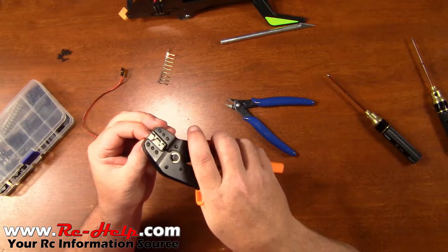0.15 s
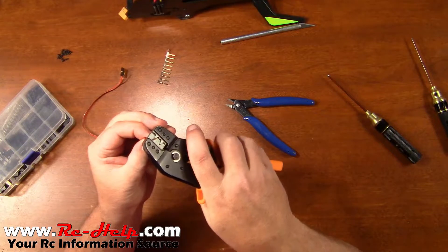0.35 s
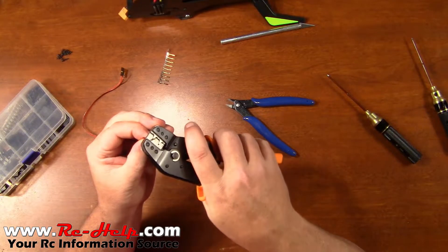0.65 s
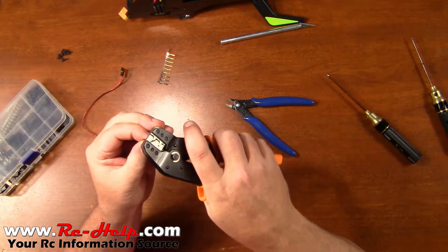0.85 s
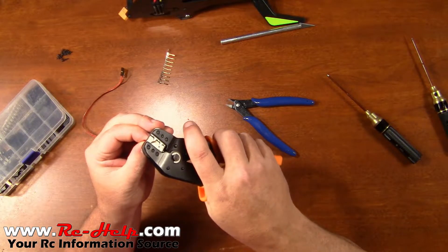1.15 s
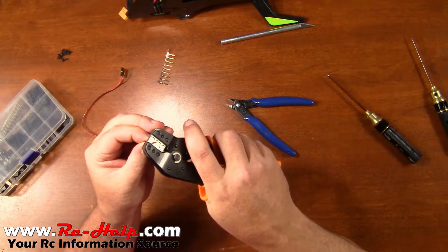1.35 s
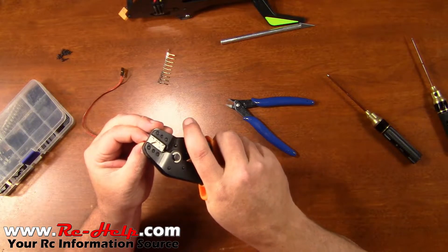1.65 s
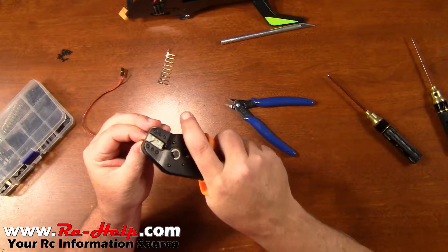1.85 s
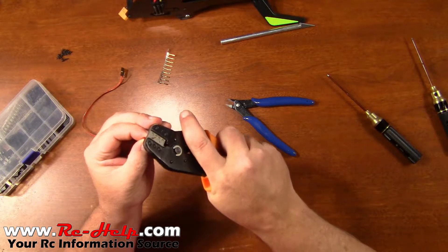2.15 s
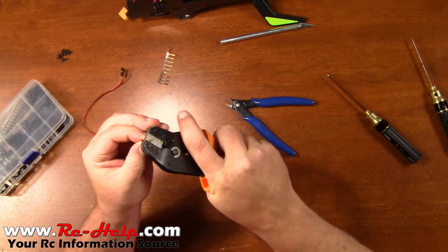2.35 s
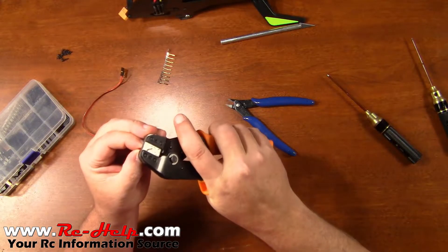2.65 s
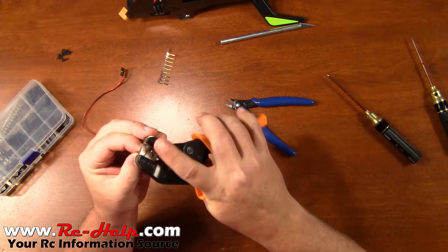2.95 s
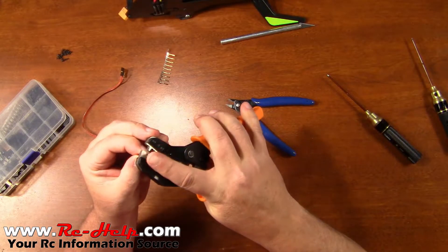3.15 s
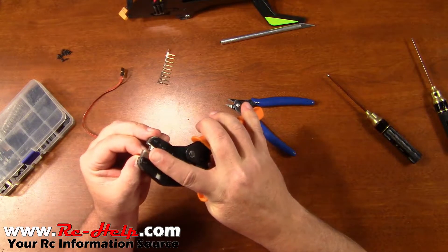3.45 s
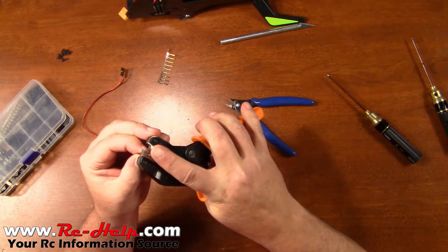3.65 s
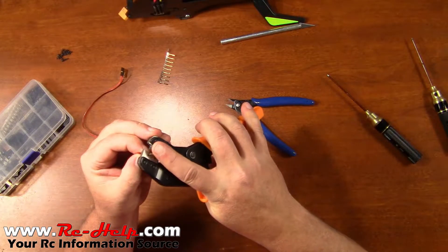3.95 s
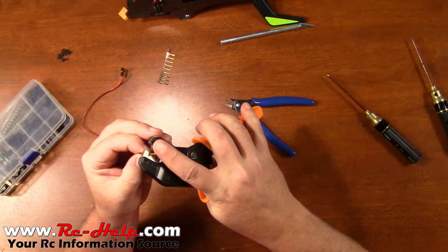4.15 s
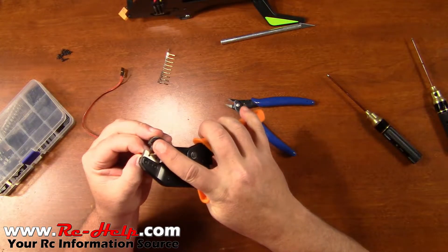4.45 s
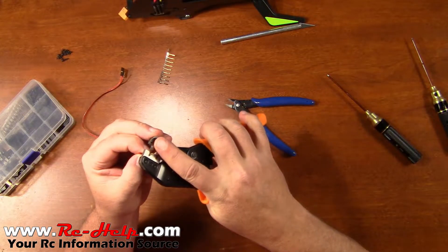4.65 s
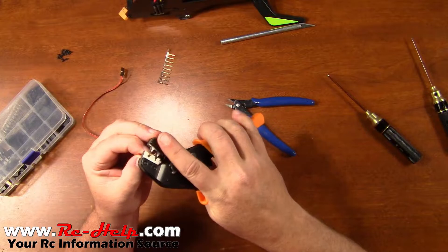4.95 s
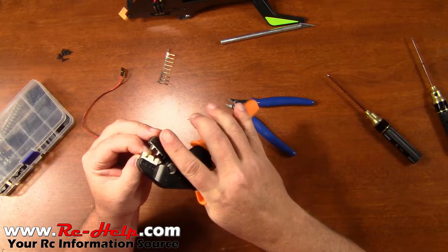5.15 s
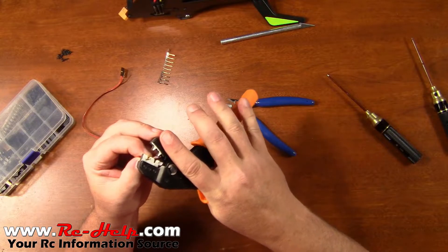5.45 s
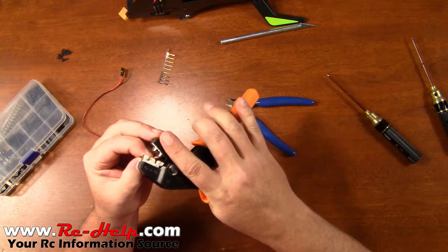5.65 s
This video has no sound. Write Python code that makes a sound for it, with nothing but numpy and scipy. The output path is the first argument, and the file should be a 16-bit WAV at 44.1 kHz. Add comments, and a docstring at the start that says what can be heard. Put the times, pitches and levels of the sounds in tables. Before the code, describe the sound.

A hand crimping tool clicks a few times as it closes, knocks softly, rattles open rapidly, and later twangs faintly over low room rumble.

```python
"""A low rumble, a dull drone, hiss and a faint mains hum lie under a small, quiet room: shaped noise and sines.
A ratcheting wire crimper is then worked over a wooden bench: its steel pawl snaps over the teeth as the handles
close, the jaws knock shut, the linkage shifts, the pawl rattles back, the return spring twangs; a faint tick ends it.
Each contact is a short noise burst coloured by the tool's resonances, with the handle and frame ringing faintly;
twang and tick are a light scrape with ringing modes. Bench scatter and a short room tail follow each burst."""
import sys
import numpy as np
from scipy import signal
from scipy.fft import rfft, irfft, next_fast_len
from scipy.io import wavfile
from scipy.ndimage import map_coordinates

SR = 44100
rng = np.random.default_rng(int(sys.argv[2]) if len(sys.argv) > 2 else 0)


def dump(signal):
    """Clip the signal to [-1, 1] and save it as 16-bit WAV at the path in sys.argv[1]."""
    limited = np.clip(np.atleast_2d(signal).T, -1, 1)
    pcm = np.round(limited * 32767).astype(np.int16)
    wavfile.write(sys.argv[1], SR, pcm)


N = 255780
LIFE = np.arange(SR) / SR  # time axis of one blow (s)
BLOW_HZ = np.fft.rfftfreq(SR, 1 / SR)  # frequency axis of one blow (Hz)


def amp(db):
    """Decibels to gain."""
    return 10 ** (np.asarray(db) / 20)


def along(points, hz):
    """Read a curve of (f/Hz, value) points, joined on a log frequency axis."""
    f, value = np.transpose(points)
    return np.interp(np.log(hz + 1), np.log(f), value)


def lift(centre_hz, width_hz, db):
    """Gain (dB) of one resonance: a peak of the given lift that fades to 0 dB on both sides."""
    offset = 2 * (BLOW_HZ - centre_hz) / width_hz
    return 10 * np.log10(1 + (amp(db) ** 2 - 1) / (1 + offset ** 2))


def sized(x):
    """Bring a blow to 0 dB, its energy counted as rms over 20 ms."""
    return x / np.sqrt(np.sum(x ** 2) / (0.02 * SR) + 1e-20)


def add(track, s, x):
    """Mix x into the track at time s (seconds)."""
    start = round(s * SR)
    track[start:start + len(x)] += x[:N - start]


def coloured(x, gain_db):
    """Minimum-phase filter: the gain on x's FFT grid becomes a response with no pre-echo."""
    cepstrum = irfft(np.log(amp(np.maximum(gain_db, -120))), len(x))
    # folding the cepstrum onto positive time makes the filter causal
    cepstrum[1:len(x) // 2] *= 2
    cepstrum[len(x) // 2 + 1:] = 0
    return irfft(rfft(x) * np.exp(rfft(cepstrum)), len(x))


def noise(spectrum):
    """Steady random noise shaped to the spectrum, at rms 1."""
    size = next_fast_len(N + SR)
    gain = amp(along(spectrum, np.fft.rfftfreq(size, 1 / SR)))
    x = irfft(rfft(rng.standard_normal(size)) * gain, size)[:N]
    return x / np.std(x)


def wobble(rate):
    """A smooth random curve through rate knots a second."""
    knots = rng.standard_normal(256)
    return map_coordinates(knots, [np.arange(N) * rate / SR], mode="wrap")


def contact(length, count=6):
    """Steel chatters on steel: a short random burst that excites all frequencies about evenly."""
    gate = np.exp(-np.minimum(LIFE / length, 10) ** 4)
    x = rng.standard_normal(SR) * gate
    for _ in range(count):
        # flatten the spectrum, then shorten the burst again
        flat = irfft(np.exp(1j * np.angle(rfft(x))), SR)
        x = flat * gate
    return x


def ring(modes, swell):
    """Decaying modes, struck a little differently each time; they build up over swell seconds."""
    hz, db, t60 = np.transpose(modes)[:, :, None]
    size = amp(db + rng.standard_normal(hz.shape))
    phase = 2 * np.pi * (hz * LIFE + rng.random(hz.shape))
    decay = np.exp(-np.log(1000) * LIFE / t60)
    return np.sum(size * decay * np.sin(phase), axis=0) * (1 - np.exp(-LIFE / swell))


def in_room(x, bench_db, bench_t60, room_db):
    """The direct sound, quick scatter from hands and bench, and the room's short tail."""
    # tail decay time: f/Hz, t60/s
    room_t60 = [(300, 0.23), (1000, 0.16), (4000, 0.17), (8000, 0.15), (15000, 0.26)]
    # tail colour: f/Hz, gain/dB
    room_gain = [(300, 5), (1500, 3.5), (4000, 5.5), (8000, -2.5), (15000, -12.5)]
    scatter = rng.standard_normal(SR) * np.exp(-np.log(1000) * LIFE / bench_t60)
    scatter *= 1 - np.exp(-LIFE / 0.0009)
    # the tail is noise in which each frequency dies at its own rate
    hz, t, z = signal.stft(rng.standard_normal(SR // 2), SR, nperseg=256)
    decay = np.exp(-np.log(1000) * t / along(room_t60, hz)[:, None])
    tail = signal.istft(z * decay, SR, nperseg=256)[1]
    tail *= 1 - np.exp(-LIFE[:len(tail)] / 0.0034)
    tail_gain_db = along(room_gain, np.fft.rfftfreq(len(tail), 1 / SR))
    tail = coloured(tail / np.linalg.norm(tail), tail_gain_db)
    answer = amp(bench_db) * scatter / np.linalg.norm(scatter)
    answer[:len(tail)] += amp(room_db) * tail
    return x + signal.fftconvolve(x, answer)[:SR]


def snaps(rows, colour, resonances, ping_width_hz, bench_db, bench_t60, room_db):
    """Each contact sounds through the tool's resonances and leaves handle and frame ringing faintly."""
    # the handle's bending mode: f/Hz, level/dB, t60/s
    handle_modes = [(930, 0.5, 1)]
    # ringing modes of the frame: f/Hz, level/dB, t60/s
    frame_modes = [(1870, -1, .38), (2770, -10, 0.18), (4030, -10.5, .26), (4330, -9.5, 0.33),
                   (4704, -9, 0.23), (4918, -11, 0.17), (6400, -16, .21), (7405, -15, .22),
                   (8053, -13.5, .21), (9898, -15.5, .19)]
    out = np.zeros(N)
    body_db = along(colour, BLOW_HZ) + sum(lift(*mode) for mode in resonances)
    for s, db, length, ping_hz, ping_db, low_hz, high_hz, handle_db, frame_db in rows:
        # a light contact radiates no bass, a soft one no treble
        band_db = -10 * np.log10(1 + (low_hz / (BLOW_HZ + 1)) ** 6 + (BLOW_HZ / high_hz) ** 4)
        ping_lift_db = lift(ping_hz, ping_width_hz, ping_db)
        direct = coloured(contact(length), body_db + band_db + ping_lift_db)
        click = sized(in_room(direct, bench_db, bench_t60, room_db))
        handle = amp(handle_db) * ring(handle_modes, swell=0.0023)
        frame = amp(frame_db) * ring(frame_modes, swell=0.015)
        add(out, s, amp(db) * (click + handle + frame))
    return out


def background():
    """Low rumble and the room's dull drone, both swelling as the hands work; microphone hiss and mains hum."""
    # noise colours before levelling: f/Hz, relative level per Hz/dB
    rumble_colour = [(7.1, -29.5), (12, 3.5), (32, -4), (110, -23), (140, -52), (240, -120)]
    drone_colour = [(30, -13), (100, -1.5), (140, -0.5), (200, -6), (330, -8), (500, -14), (750, -18),
                    (1100, -22.5), (2000, -29.5), (4000, -41.5), (16000, -70)]
    hiss_colour = [(1000, 2), (4000, -0.5), (16000, -3.5)]
    # mains hum partials: f/Hz, rms level/dB
    hum_partials = [(60, -78), (120, -85), (301.5, -91)]
    # swells while the hands hold the tool shut, then shift their grip:
    # start/s, end/s, rumble lift/dB, drone lift/dB
    swells = [(1.76, 2.486, 7.5, 1.5), (2.634, 3.7, 4, 1)]
    attack_s, release_s = 0.052, 0.12
    rumble_db, drone_db, hiss_db = -59.5, -75.5, -90  # rms, rumble and drone before swell and drift
    rumble_wander_db, drone_wander_db, wander_per_s = 1.5, 0.27, 5.6  # drift depths, knots a second
    t = np.arange(N) / SR
    start, end, rumble_lift_db, drone_lift_db = np.transpose(swells)[:, :, None]
    swell = np.clip(np.minimum((t - start) / attack_s, (end - t) / release_s), 0, 1)
    rumble_db = rumble_db + np.sum(rumble_lift_db * swell, axis=0)
    rumble_db += rumble_wander_db * wobble(wander_per_s)
    drone_db = drone_db + np.sum(drone_lift_db * swell, axis=0)
    drone_db += drone_wander_db * wobble(wander_per_s)
    rumble = amp(rumble_db) * noise(rumble_colour)
    drone = amp(drone_db) * noise(drone_colour)
    hiss = amp(hiss_db) * noise(hiss_colour)
    hum = np.zeros(N)
    for hz, db in hum_partials:
        hum += np.sqrt(2) * amp(db) * np.sin(2 * np.pi * (hz * t + rng.random()))
    return rumble + drone + hiss + hum


def twang_and_tick():
    """The return spring twangs, its coil modes ringing on; a faint separate tick follows."""
    # three spring contacts, then a faint tick:
    # t/s, common level of scrape and ring/dB, contact/s, ring trim/dB
    twangs = [(5.0095, -61, 0.0031, -15), (5.0130, -51.5, 0.0041, 0.5), (5.0183, -55, 0.0024, -14),
              (5.2095, -75.5, 0.0011, -20)]
    # colour of the scrape: f/Hz, relative level per Hz/dB
    coil_colour = [(500, -38), (2200, -27), (3300, -9.5), (5200, -15.5), (6500, 7.5), (7500, -0.5),
                   (8800, -14), (10200, 5.5), (11800, -12), (12700, -10), (15500, -9)]
    # ringing modes of the coil, lent to the tick too: f/Hz, level/dB, t60/s
    coil_modes = [(3000, -20.5, .15), (3552, -8.5, 0.34), (3700, -2, 0.062), (4395, -15.5, 0.62),
                  (4300, -17, 0.39), (5920, -2, 0.075), (6330, -2.5, 0.1), (7240, -17, 0.3),
                  (7550, -11, 0.16), (7840, -3, 0.09), (8400, -20, 0.25), (9460, -9, 0.11),
                  (9980, -2, 0.06), (10500, -9, 0.073), (11600, -11, .1), (11750, -4.5, 0.12),
                  (13200, -24, 0.1), (15200, -20, .1)]
    scrape_db = -3.0
    out = np.zeros(N)
    for s, db, length, ring_db in twangs:
        direct = coloured(contact(length), along(coil_colour, BLOW_HZ))
        scrape = sized(in_room(direct, bench_db=-3.5, bench_t60=0.066, room_db=0.5))
        coil = ring(coil_modes, swell=0.00075)
        add(out, s, amp(db) * (amp(scrape_db) * scrape + amp(ring_db) * coil))
    return out


def linkage_shifts():
    """The loose linkage shifts as the grip slackens: contacts through its resonances."""
    # t/s, level/dB, contact/s, ping f/Hz, ping lift/dB, low and high corner f/Hz,
    # handle and frame ring/dB relative to level
    shifts = [(2.4480, -89, .002, 10400, 6, 3000, 12000, -43.5, -40),
              (2.4705, -67.5, 0.0077, 8800, 6, 2490, 14000, -40.5, -41),
              (2.4765, -60, .005, 6660, 7.9, 996, 15000, -38.5, -26.5),
              (2.6680, -80, 0.009, 9500, 23, 2008, 9900, -41, -47.5)]
    # contact colour: f/Hz, relative level per Hz/dB
    loose_colour = [(500, -11.5), (3500, -4), (7000, 1.5), (15500, 3.5)]
    # resonances of the loose linkage: f/Hz, width/Hz, lift/dB
    links = [(1842, 140, 12.5), (2140, 67, 5.5), (2980, 66, 12), (3730, 110, 12.5), (4280, 40, 11),
             (5540, 80, 7), (6240, 150, 15), (6800, 77, 14), (7850, 110, 9), (8100, 67, 11.5),
             (8980, 160, 17), (10050, 70, 10), (10900, 76, 10), (14300, 180, 8)]
    return snaps(shifts, loose_colour, links, ping_width_hz=83, bench_db=-2.5, bench_t60=0.046, room_db=0.0)


def jaws_knock():
    """The jaws meet, then the linkage settles: contacts through the tool pressed shut."""
    # t/s, level/dB, contact/s, ping f/Hz, ping lift/dB, low and high corner f/Hz,
    # handle and frame ring/dB relative to level
    knocks = [(1.7770, -47.5, 0.0028, 686, 13.7, 118.5, 16000, -26.5, -37),
              (1.9297, -57, 0.0096, 5750, 16.6, 3200, 4400, -46, -28)]
    # contact colour: f/Hz, relative level per Hz/dB
    jaw_colour = [(200, 1), (800, -5.5), (1050, -17.5), (1450, -18.5), (2800, -9), (4300, -6.5),
                  (5300, -6.5), (7000, -8.5), (10500, -16), (12500, -29), (15500, -44)]
    # resonances with the jaws pressed shut: f/Hz, width/Hz, lift/dB
    shut = [(475, 46, 4), (895, 70, 14), (1770, 79, 26.5), (2190, 88, 7), (2720, 36, 14), (2940, 126, 10),
            (3900, 160, 10), (4255, 49, 5.5), (4510, 170, 10.5), (7750, 160, 13.5), (10500, 200, 8)]
    return snaps(knocks, jaw_colour, shut, ping_width_hz=81, bench_db=0.0, bench_t60=0.032, room_db=-1.0)


def pawl_release():
    """The pawl rattles back as the handles let go: contacts through the slack tool."""
    # t/s, level/dB, contact/s, ping f/Hz, ping lift/dB, low and high corner f/Hz,
    # handle and frame ring/dB relative to level
    release = [(2.7873, -33.5, 0.0038, 7300, 6.3, 900, 16670, -55, -43.5),
               (2.8147, -33.5, 0.0022, 5940, 2.9, 800, 17000, -58, -42.5),
               (2.8597, -32, 0.0018, 2970, 5, 900, 19000, -54, -43),
               (2.9297, -33, 0.0028, 9800, 4, 1400, 19000, -53, -38.5),
               (3.0127, -34.5, 0.0034, 9800, 3.8, 1195, 12900, -54.5, -27.5)]
    # contact colour: f/Hz, relative level per Hz/dB
    opening_colour = [(200, -4), (1000, -22), (2000, -18), (3500, -7.5), (5000, -7.5), (6500, -2),
                      (8500, -1.5), (10200, 0.5), (12500, -4), (15500, -4)]
    # resonances of the slack tool: f/Hz, width/Hz, lift/dB
    slack = [(1193, 74, 5.5), (1784, 70, 2.9), (1982, 32, 14), (2260, 70, 15), (3020, 85, 8.3),
             (3688, 70, 5), (4238, 70, 7.1), (4780, 40, 8.3), (6070, 86, 7.1), (6405, 80, 4), (7980, 50, 6),
             (9450, 130, 4), (10230, 140, 4), (11596, 67, 4)]
    return snaps(release, opening_colour, slack, ping_width_hz=157,
                 bench_db=-0.5, bench_t60=0.024, room_db=-0.5)


def pawl_squeeze():
    """The pawl snaps over its teeth as the handles close: contacts through the loaded tool."""
    # t/s, level/dB, contact/s, ping f/Hz, ping lift/dB, low and high corner f/Hz,
    # handle and frame ring/dB relative to level
    squeeze = [(1.0846, -42, 0.0013, 9030, 13.5, 2480, 7440, -65, -55.5),
               (1.1402, -33, 0.0017, 9920, 9, 898, 16850, -32.5, -32.5),
               (1.3170, -33.5, 0.001, 8800, 3.5, 1487, 17000, -51.5, -22),
               (1.6990, -30.5, 0.0061, 9610, 7, 698, 16000, -39.5, -32)]
    # contact colour: f/Hz, relative level per Hz/dB
    closing_colour = [(200, -29), (1000, -21), (2200, -15.5), (3300, -8), (5000, -9), (6500, -4),
                      (8000, -1.5), (10000, -1), (12000, -2), (15500, -7.5)]
    # resonances of the tool under load: f/Hz, width/Hz, lift/dB
    loaded = [(1745, 50, 10.5), (2730, 53, 8), (2950, 110, 7.5), (3520, 81, 5), (3710, 130, 5),
              (4130, 50, 5.5), (5970, 70, 5.5), (6000, 60, 5.5), (6398, 70, 6), (6565, 60, 6),
              (8985, 110, 6), (9490, 60, 3), (10650, 160, 4.5), (12300, 60, 5)]
    return snaps(squeeze, closing_colour, loaded, ping_width_hz=350,
                 bench_db=-1.5, bench_t60=0.054, room_db=-2.0)


def scene():
    """Squeeze, knock, shift, release, twang and tick over the quiet room."""
    tool = pawl_squeeze() + jaws_knock() + linkage_shifts() + pawl_release() + twang_and_tick()
    return (tool + background())[None]


def record(dry):
    """The recorder's band limit: a steep low-pass, falling 1 dB every 16 Hz to a floor of -120 dB."""
    top_hz = 15700
    size = next_fast_len(N + SR)
    hz = np.fft.rfftfreq(size, 1 / SR)
    gain = amp(-np.clip((hz - top_hz) / 16, 0, 120))
    return irfft(rfft(dry, size) * gain, size)[:, :N]


dry = scene()
out = record(dry)
dump(out)
```